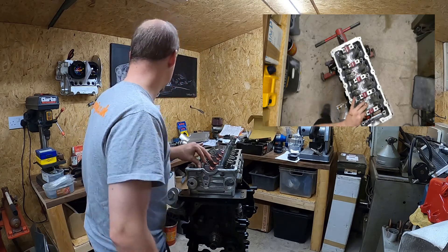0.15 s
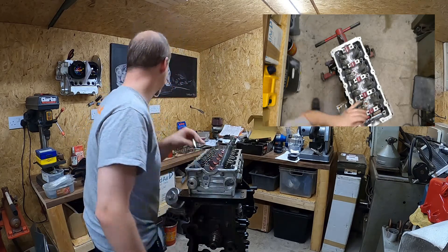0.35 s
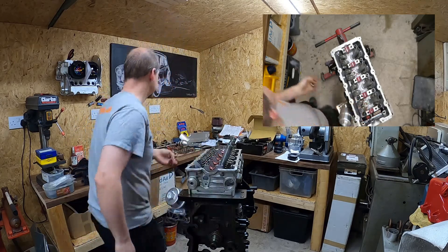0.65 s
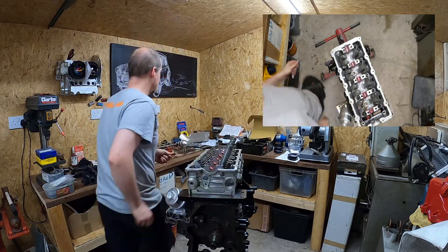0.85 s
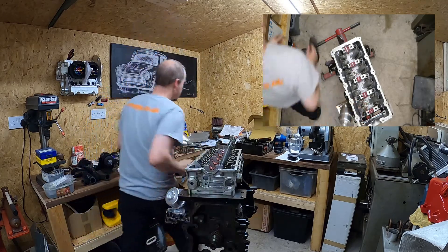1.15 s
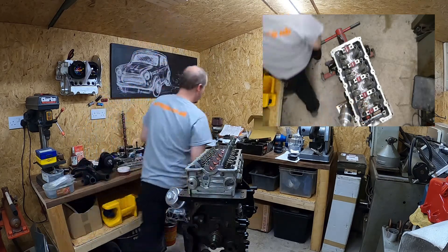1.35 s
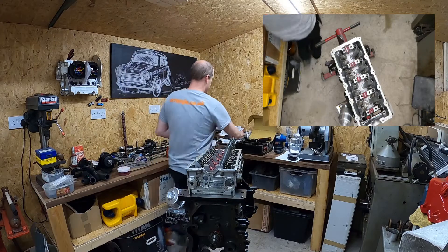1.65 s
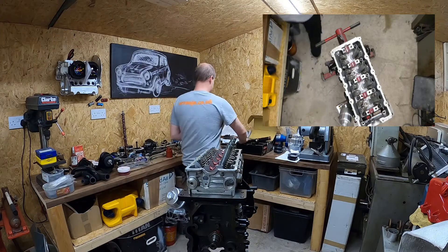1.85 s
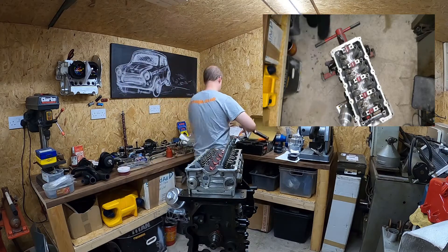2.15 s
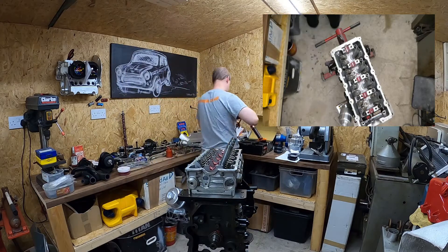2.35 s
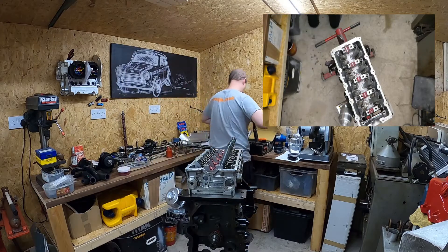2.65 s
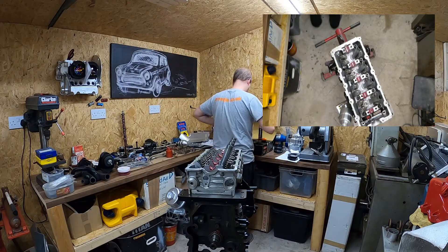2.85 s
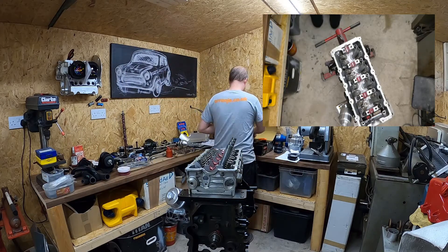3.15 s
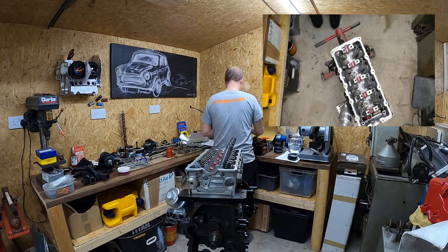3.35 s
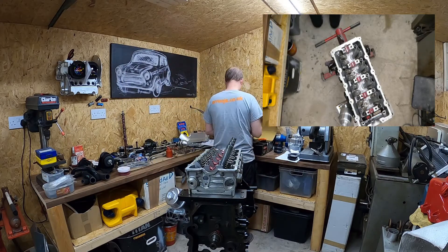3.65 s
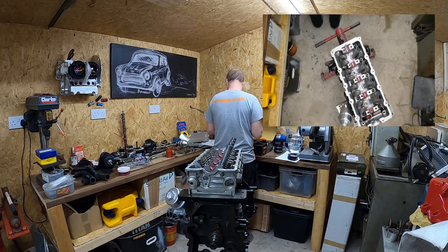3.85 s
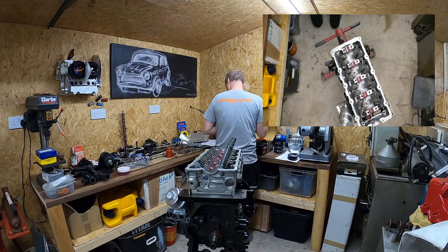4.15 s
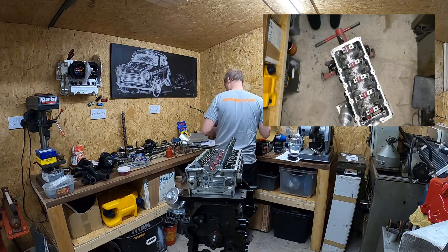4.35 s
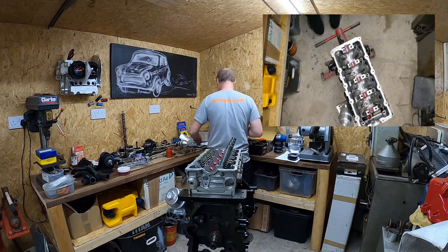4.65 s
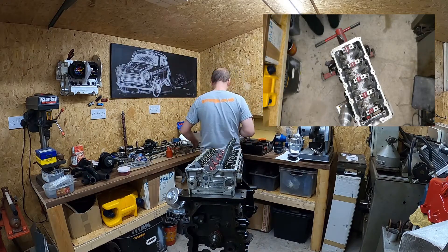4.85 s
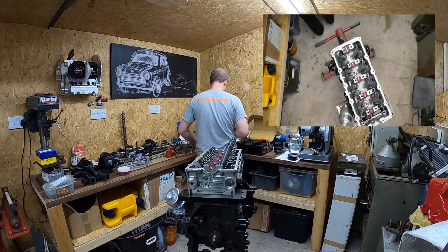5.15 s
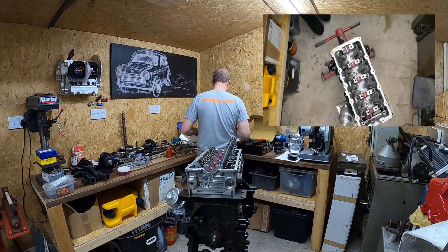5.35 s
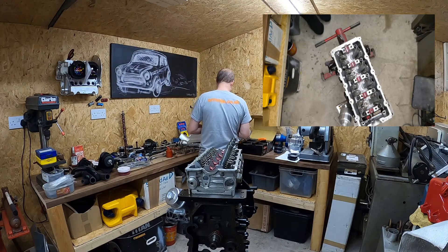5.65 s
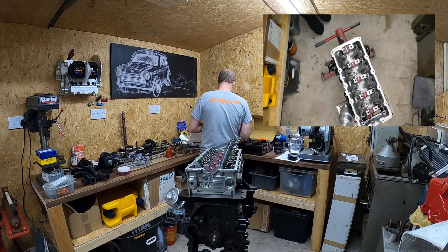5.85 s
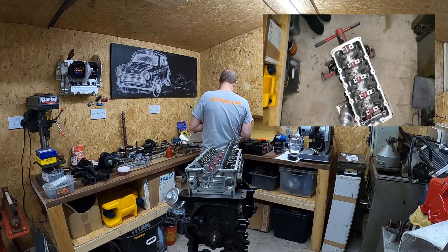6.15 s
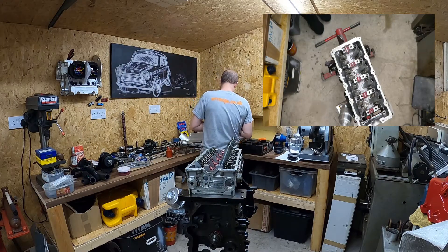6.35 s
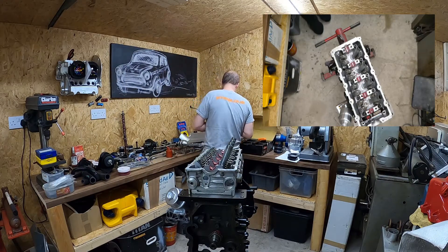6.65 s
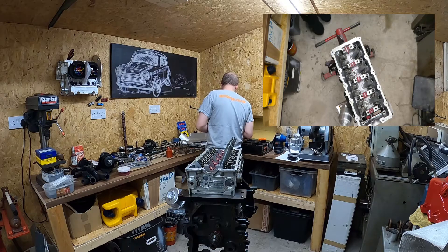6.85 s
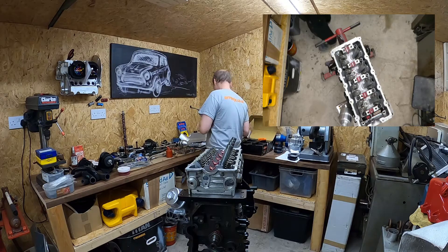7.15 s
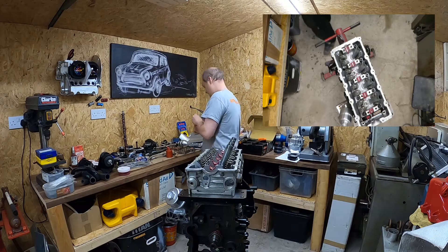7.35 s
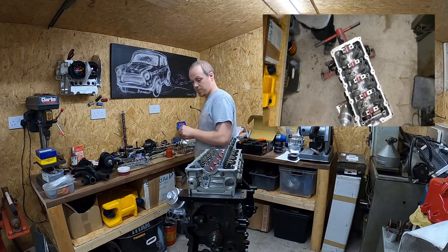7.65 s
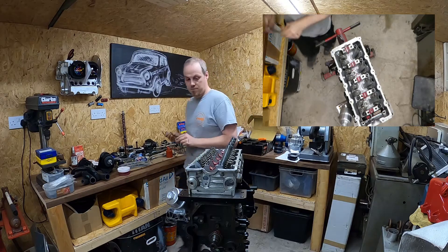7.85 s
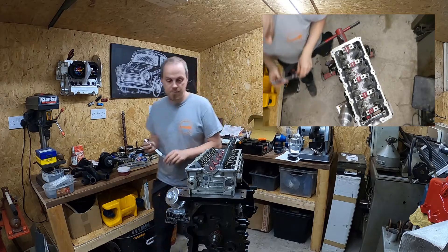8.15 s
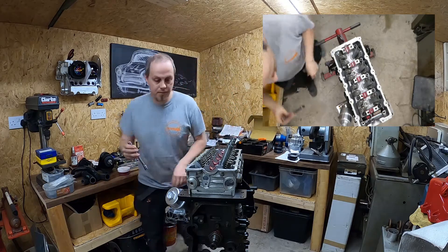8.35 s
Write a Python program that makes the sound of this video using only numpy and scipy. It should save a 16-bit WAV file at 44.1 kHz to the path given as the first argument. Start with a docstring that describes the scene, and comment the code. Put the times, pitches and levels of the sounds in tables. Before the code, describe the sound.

In a small board-lined workshop, heard in stereo from a few metres away, a light steel clink comes at about 0.4 s, followed by soft dull thuds and tiny scrapes from 0.6 to 1.0 s. A step thumps at 1.4 s with a scuff and cloth rustle. The loudest event is a hollow, woody double knock at 2.1-2.2 s with low floor rumble. Short gritty scrapes follow at 2.5-2.8 s. From 3.2 to 3.7 s tools slide and rattle in the case, with a bright steel clink at 3.5 s. Another clink rings at 4.2 s, a scrape at 4.6 s and a scrape with a knock at 5.4 s. Small clinks cluster at 5.8-5.9 s and again at 6.5-6.7 s. It is nearly quiet until a soft movement at 7.4 s, then thuds and a broader scuff at 8.2-8.5 s. Faint hum and hiss continue throughout.

```python
"""Steel pieces clink as a man walks to a bench in a small board-lined workshop and picks through a tool case.
Short noise bursts ring the resonances of the steel, and deeper blows those of the case and bench.
Soles and cloth scuff and rustle as gritty noise, tools slide and the boards rumble; a low hum and hiss lie below.
Two close microphone ports hear it from a few metres away, mostly through the room."""
import sys
import numpy as np
from scipy import signal
from scipy.fft import rfft, irfft, next_fast_len
from scipy.io import wavfile
from scipy.ndimage import uniform_filter1d

SR = 44100
rng = np.random.default_rng(int(sys.argv[2]) if len(sys.argv) > 2 else 0)


def wav_record(signal):
    """Record a signal, one row per channel, as 16-bit PCM in the file named by sys.argv[1]."""
    frames = np.transpose(np.atleast_2d(signal))
    bounded = np.clip(frames, -1, 1)
    # unit amplitude maps onto the largest positive 16-bit level
    quanta = np.round(bounded * 32767).astype(np.int16)
    wavfile.write(sys.argv[1], SR, quanta)


N = 374608  # samples, about 8.5 s

# resonances of the tool case: pitch_hz [Hz], width_hz [Hz], level_db [dB]
CASE_MODES = [(110, 12, -7), (156, 17, 5), (200, 30, 7), (240.8, 45.8, 4.5), (285, 38.3, 4),
              (330, 43, -1.5), (398, 32, -1.5), (435.2, 17, 3.5), (510.7, 40.3, -0.5), (643.7, 24, 1.5),
              (763, 35, -4.5), (960, 26, 4.5), (983, 210, -6), (1444, 68, -0.5), (1731, 17, 11),
              (2380, 560, -18), (3300, 130, -13.5)]


def clinks():
    """Steel on steel: each touch chatters for a few ms, rings the piece and adds a broad crack."""
    # touches: start_s [s], level_db [dB, before the final trim], crack_db [dB against the ring], chatter_s [s]
    touches = [(0.1102, -44, -13, 0.0026), (0.3545, -55, 2, 0.0027), (0.3803, -27, 5, 0.0034),
               (3.5206, -13.5, -5.5, 0.0028), (3.7272, -53, 10, 0.0053), (4.234, -20.5, 4.5, 0.0056),
               (5.777, -38, 4, 0.009), (5.8383, -23, -4.5, 0.0054), (5.9181, -29.5, -9, 0.0044),
               (5.9306, -28.5, -2, 0.0068), (6.4699, -29.5, -18, 0.0039), (6.4779, -23, 2.5, 0.0047),
               (6.7183, -23, -6.5, 0.0062)]
    # which steel piece each touch rings: row number in the next table
    piece_struck = [0, 0, 0, 1, 2, 3, 4, 4, 4, 5, 6, 6, 7]
    # one list a piece, damped by hand and tray: pitch_hz [Hz], width_hz [Hz, before widening], level_db [dB]
    steel_modes = [
        [(1560, 54, -2.5), (2584, 32, 3.5), (2796, 43, 1.5), (4160, 45, -5), (4670, 140, -10), (5100, 67, -9),
         (5280, 320, -8), (5700, 55, -4), (6030, 200, -6), (7200, 77, -32)],
        [(631, 26, 10), (1400, 76, -17.5), (1680, 71, 4), (2460, 660, -3.5), (3120, 99, 7.5), (3480, 100, -6.5),
         (4670, 120, 7.5), (5320, 650, -11), (6330, 290, -17.5)],
        [(2080, 100, -23.5), (3000, 79, -32.5), (4030, 130, -13), (5280, 55, 5), (9000, 90, -26)],
        [(2477, 120, 9.5), (2720, 150, 1.5), (3480, 8.9, -46.5), (4000, 110, -0.5), (4650, 58, 2.5),
         (5300, 74, 5), (6710, 89, 8.5), (8140, 260, 0.5), (8920, 460, 1), (11000, 250, -13), (12300, 250, -15)],
        [(2480, 200, -3.5), (2920, 86, -1), (3460, 55, -5), (3760, 130, -7.5), (5600, 110, -23),
         (6510, 210, -7), (7175, 51, -7), (8800, 52, -37), (12600, 150, -35)],
        [(1850, 150, -5), (2180, 97, 6.5), (2710, 80, -5), (3240, 120, -4), (3540, 80, -28), (5640, 130, -10),
         (6640, 150, -16), (8050, 80, -16), (12700, 90, -34)],
        [(1670, 250, 2), (2000, 165, 6.5), (2470, 180, 0.5), (4920, 300, -9), (4600, 130, 1.5), (5610, 75, -12),
         (6380, 91, -6.5), (6870, 88, 6), (6670, 77, -6), (8670, 200, -4.5), (9600, 130, -9), (12700, 87, -27)],
        [(2137, 70, -2.5), (2240, 57, -7), (2550, 30, -5), (2820, 180, -8.5), (3850, 60, -17), (5240, 160, -9),
         (5550, 190, -11.5), (8700, 410, -22), (12650, 79, -47)],
    ]
    # colour of the crack: pitch_hz [Hz], level_db [relative dB per Hz]
    crack_colour = [(700, -20.5), (1500, -4), (2200, 0.5), (4500, 6), (7000, 5), (10500, -13), (13000, -13),
                    (15500, -50)]
    out, t = np.zeros((2, N)), np.arange(8192) / SR
    for (start_s, level_db, crack_db, chatter_s), piece in zip(touches, piece_struck):
        contact = rng.standard_normal(len(t)) * t * np.exp(-2 * t / max(chatter_s, .0003))
        ring = 0
        for hz, width_hz, mode_db in steel_modes[piece]:
            # a wider peak of equal height holds more energy
            gain = from_db(mode_db) * np.sqrt(width_hz)
            ring = ring + gain * energy_one(cluster(contact, hz, width_hz))
        crack = colour(contact, crack_colour) * (t < .1)
        clink = energy_one(ring) + from_db(crack_db) * energy_one(crack)
        add(out, start_s, from_db(level_db - 8.5) * clink)
    return out


def knocks():
    """Where and how softly a blow lands decides which modes answer; what rests on the case damps them."""
    # blows on case, bench and floor: start_s [s], level_db [dB, before the final trim],
    # pitch_hz [Hz, most excited], reach [octaves for an 11 dB drop], damping_s [s]
    blows = [(0.583, -29, 223, 0.72, 0.018), (0.619, -30.5, 302, 0.78, 0.016),
             (0.809, -37.5, 191, 0.72, 0.011), (1.384, -20.5, 193, 0.64, 0.03),
             (1.756, -27.5, 310, 1, 0.0341), (1.894, -31, 210, 1, 0.0064), (1.966, -39, 201, 1, 0.037),
             (2.095, -5, 500, 0.7, 0.033), (2.168, -9.5, 480, 0.5, 0.018), (2.199, -17.5, 265, 0.14, 0.027),
             (3.244, -22, 285, 0.86, 0.0088), (3.277, -21, 172, 0.93, 0.015),
             (3.341, -15.5, 464, 0.61, 0.04), (3.364, -29, 430, 0.48, 0.047), (3.534, -27, 627, 1, 0.036),
             (3.667, -23, 458, 0.6, 0.037), (4.013, -29.5, 457, 0.98, 0.032), (4.07, -28, 407, 0.65, 0.03),
             (4.188, -32, 630, 0.19, 0.033), (4.624, -23.5, 338, 0.41, 0.011),
             (5.123, -40, 620, 0.18, 0.037), (5.241, -43, 220, 0.45, 0.03), (5.415, -26.5, 402, 1, 0.022),
             (7.413, -32.5, 198, 0.47, 0.022), (7.51, -35.5, 180, 1, 0.035), (8.239, -26, 266, 0.42, 0.012),
             (8.458, -27, 293, 0.32, 0.03)]
    thump_s, thump_db = 0.016, 7.5  # the first push stands over the ring
    soft_above = 4.4  # a blow dulls above this multiple of its pitch
    out, t = np.zeros((2, N)), np.arange(6000) / SR
    for start_s, level_db, centre_hz, reach, damping_s in blows:
        contact = (t == 0) + 0.14 * rng.standard_normal(len(t)) * np.exp(-t / 0.002)
        contact = band(contact, 20, soft_above * centre_hz)
        thump = from_db(thump_db) * np.exp(-(t / thump_s) ** 2)
        dying = np.exp(-t / max(damping_s, .003)) + thump
        body = favoured(CASE_MODES, contact, centre_hz, max(reach, .2)) * dying
        # blows of higher pitch slap more
        slap = energy_one(band(contact, 530, 1500)) * (centre_hz / 500) ** 2
        knock = energy_one(body) + from_db(-14.5) * slap
        add(out, start_s, from_db(level_db - 12.5) * knock)
    return out


def scrapes():
    """Short scrapes: grit under a stroke that bites quickly and lets go."""
    # strokes: start_s [s], level_db [dB, before the final trim], treble_db and body_db [dB against the middle],
    # length_s [s], bright_hz [Hz, brightest pitch]
    strokes = [(0.682, -25, -9, -22, 0.0072, 3000), (0.719, -21, 1, -18, 0.0048, 3500),
               (0.746, -28.5, 3.5, -15, 0.009, 2500), (1.0078, -28, -2, -8.5, 0.066, 2400),
               (2.007, -14.5, -0.5, -2.5, 0.033, 3200), (2.5188, -20.5, -7, -11, 0.036, 2800),
               (2.667, -32, 17, -36, 0.0048, 3500), (2.7024, -22.5, 7.5, -48, 0.011, 2800),
               (2.806, -32.5, 14.5, -28, 0.0097, 2500), (3.243, -36.5, -1, 15.5, 0.011, 1700),
               (3.33, -26.5, -10, -4, 0.027, 1700), (3.426, -29, -19, -10, 0.043, 2000),
               (3.663, -30, -26, -9, 0.011, 1700), (3.963, -28.5, -3, 5.5, 0.013, 1700),
               (3.973, -41.5, -18, -6, 0.063, 1600), (4.069, -42.5, -12, -10, .04, 1600),
               (4.62, -16, -9.5, -10, 0.061, 2600), (4.657, -18, -9.5, -10, 0.038, 2700),
               (5.388, -32.5, 2, 2, 0.053, 2200), (5.4068, -19.5, 0.5, -5.5, 0.02, 2200),
               (6.85, -40, -22, -24.5, 0.012, 2500), (7.41, -39, 12.5, -3, 0.0094, 2000)]
    rise_s, pan_db = 0.0066, 0.6
    sharpness = 1.09  # pitch over width of the brightest stretch
    out, t = np.zeros((2, N)), np.arange(8192) / SR
    for start_s, level_db, treble_db, body_db, length_s, bright_hz in strokes:
        body, middle, treble = three_bands(*grains(3, len(t), spread_db=2.5))
        middle = rms_one(resonate(middle, bright_hz, bright_hz / sharpness))
        stroke = np.minimum(t / rise_s, 1) * np.exp(-(t / max(length_s, .001)) ** 2)
        grit = middle + from_db(treble_db) * treble + from_db(body_db) * body
        add(out, start_s, from_db(level_db - 15) * stroke * grit, pan_db)
    return out


def rustle():
    """Long scuffs and cloth noise, already spread by the room; here and there the grit catches."""
    # soles, cloth and hands: start_s [s], level_db [dB], rise_s [s], hold_s [s], fall_s [s],
    # treble_db [dB against the middle]; rise and fall span 20 dB
    movements = [(0.0, -60, .05, 0.0088, 0.48, -2), (.116, -55, 0.014, .005, 0.08, -6),
                 (.682, -49.5, 0.068, 0.089, 0.1, -1.5), (1.06, -52.5, 0.18, 0.205, 0.9, -0.5),
                 (1.434, -47, .02, .05, 0.12, -3), (1.52, -37.5, 0.044, 0.012, 0.1, 0),
                 (1.75, -43.5, 0.13, 0.098, 0.07, -7.5), (1.898, -46.5, 0.09, 0.0039, 0.16, -6),
                 (2.005, -38.5, 0.017, 0.058, 0.23, -2), (2.2, -50, 0.15, 0.033, 0.18, -13.5),
                 (3.02, -50, 0.81, 0.053, 0.099, -3), (3.38, -46.5, 0.045, 0.035, .1, -14),
                 (3.438, -40.5, 0.069, .005, 0.078, -16), (3.5, -43.5, .05, .005, 0.53, -18),
                 (4.02, -52.5, 0.027, 0.066, 0.088, -9.5), (4.114, -49, 0.18, 0.0033, 0.034, -10),
                 (4.22, -58, 0.22, .005, 0.27, -4), (4.416, -59.5, 0.094, .005, 0.1, -3),
                 (4.64, -57, 0.009, 0.0047, 0.37, -6), (5.066, -60.5, 0.016, .005, .1, 1),
                 (5.118, -51.5, 0.016, 0.004, 0.16, -1), (5.23, -60, 0.037, .005, 0.15, 2),
                 (5.38, -69, 0.09, 0.0037, 0.24, 2), (6.276, -62.5, .01, .003, 0.043, -5),
                 (6.868, -57.5, 0.012, 0.13, 0.054, -2), (7.254, -59.5, 0.05, .005, 0.27, -2.5),
                 (7.46, -42.5, 0.048, 0.034, 0.093, -2), (7.652, -51.5, 0.029, 0.054, 0.054, -3.5),
                 (8.322, -32, 0.081, 0.073, 0.14, -4)]
    # faint stir of clothes between the movements: time_s [s], level_db [dB]
    clothes_stir = [(0, -89), (.6, -64), (.9, -61.5), (2.45, -97), (3.1, -66), (3.2, -96), (4.5, -72.5),
                    (5.7, -72), (6.1, -88), (6.44, -81.5), (6.5, -82), (7.2, -65), (7.3, -67.5),
                    (8.2, -60.5), (8.49, -62)]
    stir_treble_db = 1.5
    ticks_per_s, tick_db, tick_s = 60, -8, .008  # small catches of grit: rate, size, decay

    def stir_db(t):
        """The stir's level at any time."""
        return np.interp(t, *np.transpose(clothes_stir))

    level, treble_db = swells(movements, stir_db, stir_treble_db)
    first = ports(*grains(3, N, spread_db=-2.5))
    second = ports(*grains(3, N, spread_db=-2.5))
    _, middle, treble = three_bands(first, second, first)
    catches = (rng.random(N) < ticks_per_s / SR) * rng.exponential(1, N)
    ticks = signal.lfilter([1], [1, -np.exp(-1 / (tick_s * SR))], catches)
    uneven = rms_one(1 + from_db(tick_db) * ticks)
    return level * uneven * (middle + from_db(treble_db) * treble)


def rattle():
    """Tools sliding in the case: uneven bumps excite the modes of the case."""
    # slides: start_s [s], level_db [dB], rise_s [s], hold_s [s], fall_s [s], pitch_hz [Hz, most excited];
    # rise and fall span 20 dB
    slides = [(.752, -48.5, 0.064, .005, 0.17, 454), (1.03, -49.5, 0.04, 0.0045, 0.16, 328),
              (1.382, -41.5, 0.0071, 0.0054, .35, 251), (1.78, -49, 0.18, .19, .1, 319.5),
              (2.032, -35, 0.059, 0.008, .06, 439), (2.12, -37.5, 0.026, .04, .15, 480),
              (2.54, -42, 0.02, 0.0045, 0.06, 414), (2.98, -49.5, .15, 0.0075, 0.1, 592),
              (3.26, -43, 0.022, 0.16, 0.18, 330), (3.43, -33.5, 0.063, 0.11, 0.066, 500),
              (3.535, -29.5, 0.018, 0.0043, 0.15, 622), (3.675, -32.5, 0.024, 0.0057, 0.049, 437),
              (4.0, -46.5, 0.07, 0.067, .1, 488), (4.09, -45.5, .1, .17, 0.04, 451),
              (5.132, -49, .035, 0.0039, .076, 470), (5.234, -50.5, .025, 0.0055, 0.098, 278.6),
              (6.48, -60, 0.054, 0.0046, 0.055, 297.5), (6.99, -68, 0.19, 0.0042, 0.095, 336),
              (7.42, -48.5, 0.025, 0.0053, 0.13, 326), (7.73, -63.5, 0.63, 0.0035, 0.14, 311.2),
              (8.16, -50.5, 0.039, .005, .054, 259.7), (8.24, -39, 0.0077, 0.0081, 0.097, 263),
              (8.42, -38, .18, .005, 0.11, 701)]
    rest_db, rest_hz = -83, 260.2
    level, centre_hz = swells(slides, lambda t: rest_db + 0 * t, rest_hz)
    grit = ports(*grains(3, N, spread_db=6.5))
    bumps = favoured(CASE_MODES[1:], grit, centre_hz, reach=1.3)
    return level * rms_one(bumps)


def rumble():
    """Weight shifting on the floor: noise excites the low modes of the boards."""
    # shifts of weight: start_s [s], level_db [dB], hold_s [s], pitch_hz [Hz, most excited]
    weight_shifts = [(0.0, -60, 0.0085, 66.2), (0.18, -58, 0.022, 69.8), (0.449, -56.5, 0.0082, 80),
                     (0.603, -57, 0.33, 87.1), (1.256, -55.5, .01, 55), (1.414, -36.5, 0.0086, 69.6),
                     (1.75, -53, .01, 97.8), (1.907, -47.5, 0.3, 85), (2.213, -29, 0.017, 76),
                     (2.364, -53.5, .2, 64), (3.342, -35, 0.0021, 93), (3.539, -34, 0.0046, 94.1),
                     (4.085, -53.5, 0.014, 79), (4.349, -60, 0.075, 63.9), (4.714, -54, .03, 81.7),
                     (5.413, -55, .03, 90), (5.48, -51.5, 0.012, 80), (7.68, -59, 0.08, 55.7),
                     (8.075, -61.5, .01, 82.1), (8.291, -52, .01, 81.2), (8.49, -52.5, .01, 95.7)]
    # resonances of the floor boards: pitch_hz [Hz], width_hz [Hz], level_db [dB]
    board_modes = [(27.94, 13, 8), (43, 26, 1), (65, 12, -1.5), (99, 34, -10)]
    rise_s, fall_s = .09, .11  # for 20 dB
    rest_db, rest_hz = -68.5, 80
    rows = [(start_s, db, rise_s, hold_s, fall_s, hz) for start_s, db, hold_s, hz in weight_shifts]
    level, centre_hz = swells(rows, lambda t: rest_db + 0 * t, rest_hz)
    noise = ports(*rng.standard_normal((3, N)))
    return level * rms_one(favoured(board_modes, noise, centre_hz, reach=0.89))


def background():
    """Steady hiss, and a wavering hum made of noise passed twice through narrow resonances."""
    # hum: pitch_hz [Hz], width_hz [Hz, of each pass], level_db [dB]
    hum_tones = [(63.36, 5.5, -71), (134, 12, -68.5), (165.9, 20, -75)]
    # colour of the hiss: pitch_hz [Hz], level_db [relative dB per Hz]
    hiss_colour = [(20, -3), (45, -9), (90, -8), (200, 5.5), (400, -4), (780, -12.5), (1100, -6),
                   (2100, -9.5), (3300, -21.5), (6500, -21), (9000, -36), (11500, -37), (15500, -35)]
    # the ports share hiss and hum far less than bench sounds:
    # pitch_hz [Hz], likeness [0-1], left_late [rad], left_over_right_db [dB]
    hiss_ports = [(60, .6, .4, -1), (150, .42, .6, -2.5), (400, .43, 1, -4.5), (800, .52, 1.4, -4.5),
                  (1200, .53, 1.1, 1), (2300, .58, 1, 4), (3000, .48, 1.2, 5), (4000, .27, 1.3, 4),
                  (7000, .16, 1.4, 2.5), (12000, .06, .5, -2)]
    hiss_db = -61.5
    white = ports(*rng.standard_normal((3, N)), hiss_ports)
    hum = 0
    for hz, width_hz, level_db in hum_tones:
        tone = resonate(resonate(white, hz, width_hz), hz, width_hz)
        hum = hum + from_db(level_db) * rms_one(tone)
    return from_db(hiss_db) * rms_one(colour(white, hiss_colour)) + hum


def workshop(x):
    """The room: direct sound plus a dense tail that builds in a few ms and dies band by band."""
    # tail: pitch_hz [Hz], t60_s [s to fall 60 dB], level_db [dB over direct, before the build-up]
    room_tail = [(92.6, 0.22, -2), (500, 0.12, -1), (2000, 0.23, 2.5), (4984, 0.23, 0), (11400, 0.17, -0.5)]
    build_s = 0.00098
    t = np.arange(16384) / SR
    edges = 40 * 2 ** np.arange(0, 9.1)  # octave bands, Hz
    noise, tail = ports(*rng.standard_normal((3, len(t)))), 0
    hz, t60_s, level_db = np.transpose(room_tail)
    for k, (low, high) in enumerate(zip(edges, edges[1:])):
        log_centre = np.log(low * high) / 2
        band_t60 = np.interp(log_centre, np.log(hz), t60_s)
        band_db = np.interp(log_centre, np.log(hz), level_db)
        echoes = rfft(noise * from_db(-60 * t / band_t60))
        # even out the echo noise over about 80 Hz, for a smooth, dense tail
        echoes /= np.sqrt(uniform_filter1d(np.mean(np.abs(echoes) ** 2, axis=0), size=30))
        # alternate signs keep neighbouring bands from cancelling where they cross
        tail = tail + (-1) ** k * from_db(band_db) * band(irfft(echoes) * (t < .33), low, high)
    # the direct click sits 64 samples in, cut off again below
    click = 1. * (np.arange(len(t)) == 64)
    reply = ports(click, 0 * click, 0 * click) + tail * (1 - np.exp(-t / build_s))
    return signal.fftconvolve(x, reply, axes=1)[:, 64:N + 64]


def ports(common, left, right, likeness_table=None):
    """Two close ports: a shared part, late on the left, and a part of their own."""
    # what the ports make of sounds from the bench:
    # pitch_hz [Hz], likeness [0-1], left_late [rad], left_over_right_db [dB]
    bench_ports = [(60, .99, .05, 1), (400, .96, .2, .2), (800, .92, .35, .3), (1700, .86, .55, 1.2),
                   (2600, .82, .7, 2.7), (4000, .63, .75, 2), (5500, .48, .8, 1), (7000, .4, 1.2, .8),
                   (9000, .25, 1, -2), (12000, .13, 2, -2.5)]
    table = np.array(bench_ports if likeness_table is None else likeness_table)
    size = next_fast_len(len(common))
    alike, late, lean_db = (at_hz(table[:, [0, k]], size) for k in (1, 2, 3))
    skew = from_db(lean_db / 2) * np.exp(-.5j * late)
    shared = np.sqrt(alike) * rfft(common, size)
    left_port = (shared + np.sqrt(1 - alike) * rfft(left, size)) * skew
    right_port = (shared + np.sqrt(1 - alike) * rfft(right, size)) / skew
    return irfft(np.array([left_port, right_port]), size)[:, :len(common)]


def grains(count, size, spread_db):
    """Noises that share uneven lumps of about a millisecond: gritty rather than smooth."""
    lumps = rms_one(uniform_filter1d(rng.standard_normal(size), size=60))
    return rng.standard_normal((count, size)) * from_db(spread_db * lumps)


def three_bands(*gritty):
    """Body, middle and treble from the noises given, rms 1 each."""
    # colour of grit: pitch_hz [Hz], level_db [relative dB per Hz]
    grit_colour = [(150, -24), (300, 8.5), (1000, 8.5), (1800, 6), (2800, 4.5), (5000, -1.5), (7000, -8.5),
                   (10000, -19.5), (15500, -36.5)]
    edges = (250, 1000), (1000, 4500), (4500, 15500)  # Hz
    return [rms_one(band(colour(x, grit_colour), *hz)) for x, hz in zip(gritty, edges)]


def swells(rows, rest_db, rest_value):
    """Movements that rise, hold and fall over a resting level; the last column follows whichever is loudest."""
    t = np.arange(0, N + 32, 32) / SR
    power = from_db(2 * rest_db(t))
    weighted = power * rest_value
    for start_s, level_db, rise_s, hold_s, fall_s, value in rows:
        before = (start_s - t) / max(rise_s, .003)
        after = (t - start_s - hold_s) / max(fall_s, .003)
        below = np.maximum(np.maximum(before, after), 0)
        own = from_db(2 * (level_db - 20 * below))
        power, weighted = power + own, weighted + own * value
    return [np.interp(np.arange(N) / SR, t, curve) for curve in (np.sqrt(power), weighted / power)]


def resonate(x, hz, width_hz):
    """Two-pole resonance, gain 1 on top."""
    r = np.exp(-np.pi * max(width_hz, 3) / SR)
    feedback = [1, -2 * r * np.cos(2 * np.pi * hz / SR), r * r]
    return signal.lfilter(np.array([1, 0, -1]) * (1 - r * r) / 2, feedback, x + 1e-18)


def cluster(x, hz, width_hz):
    """Close modes merge into a fuller peak with steep sides: a wider resonance applied twice."""
    return resonate(resonate(x, hz, 2.6 * width_hz), hz, 2.6 * width_hz)


def favoured(modes, x, centre_hz, reach):
    """All resonances, each weaker the more octaves it lies from the most excited pitch."""
    total = 0
    for k, (hz, width_hz, level_db) in enumerate(modes):
        octaves = np.abs(np.log2(hz / centre_hz))
        gain = from_db(level_db - 11 * octaves / reach)
        total = total + (-1) ** k * gain * resonate(x, hz, width_hz)
    return total


def at_hz(points, size):
    """A spectrum table read on the bins of a transform of that size."""
    hz, value = np.transpose(points)
    return np.interp(np.log(np.arange(size // 2 + 1) * SR / size + 1), np.log(hz), value)


def colour(x, spectrum):
    """Shape x by the levels of a spectrum table."""
    size = next_fast_len(x.shape[-1])
    return irfft(rfft(x, size) * from_db(at_hz(spectrum, size)), size)[..., :x.shape[-1]]


def band(x, low_hz, high_hz):
    """Butterworth band-pass."""
    return signal.sosfilt(signal.butter(2, [low_hz, high_hz], "band", fs=SR, output="sos"), x)


def add(out, start_s, x, pan_db=0):
    """Mix a short sound into the stereo pair at its start time."""
    i = int(round(start_s * SR))
    out[:, i:i + len(x)] += x[:N - i] * from_db([[pan_db / 2], [-pan_db / 2]])


def from_db(db):
    """dB to gain."""
    return 10 ** (np.asarray(db) / 20)


def rms_one(x):
    """Scale to rms 1."""
    return x / np.sqrt(np.mean(x ** 2) + 1e-20)


def energy_one(x):
    """Scale so that the whole energy fits 10 ms of rms 1."""
    return x / np.sqrt(np.sum(x ** 2) / (.01 * SR))


def scene():
    """Hits and scrapes through the room, over the continuous layers."""
    hits = workshop(clinks() + knocks() + scrapes())
    return hits + rustle() + rattle() + rumble() + background()


def record(dry):
    """The top is cut: a steep low-pass is 70 dB down from 15800 Hz up."""
    return signal.sosfilt(signal.cheby2(12, 70, 15800, fs=SR, output="sos"), dry)


dry = scene()
out = record(dry)
wav_record(out)
```